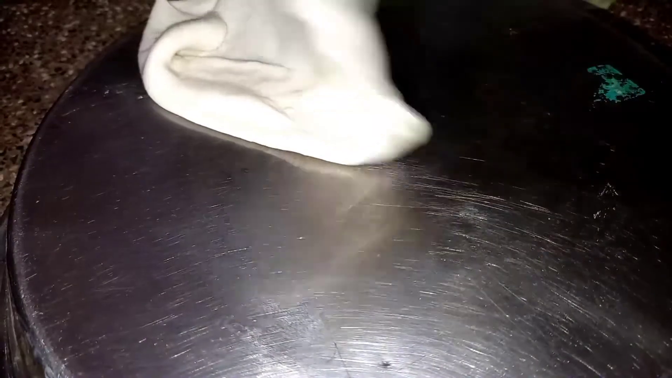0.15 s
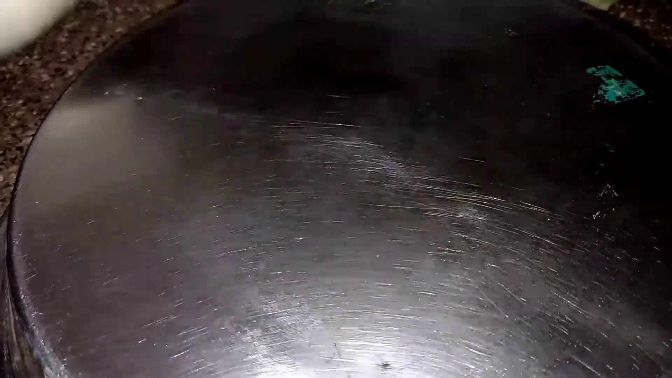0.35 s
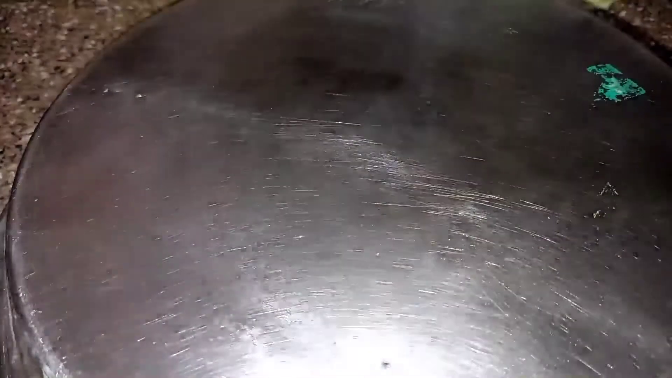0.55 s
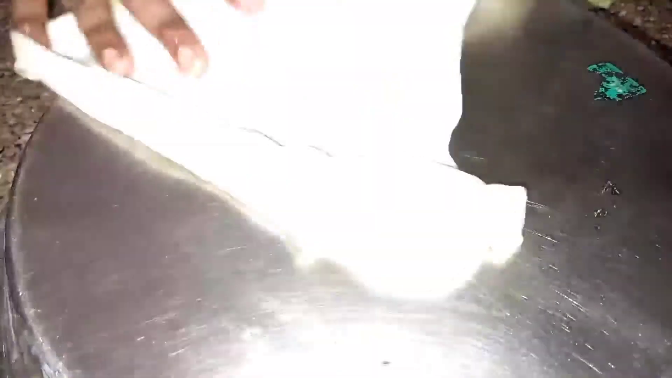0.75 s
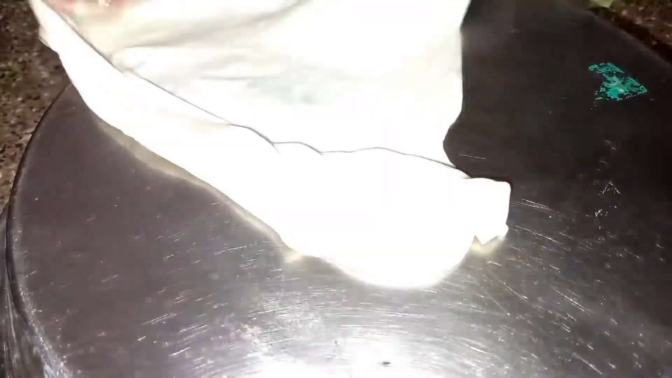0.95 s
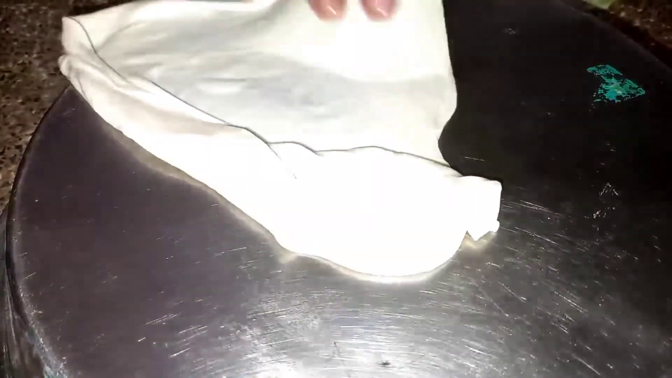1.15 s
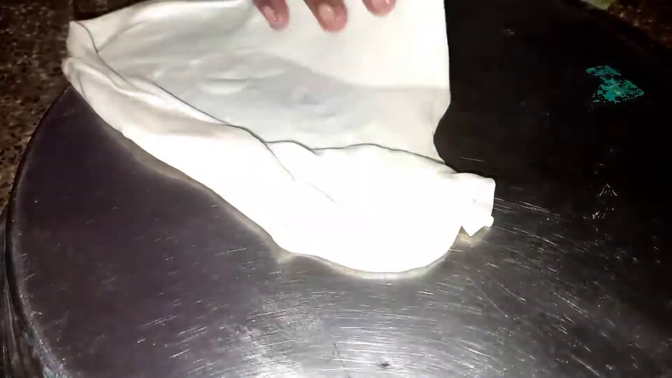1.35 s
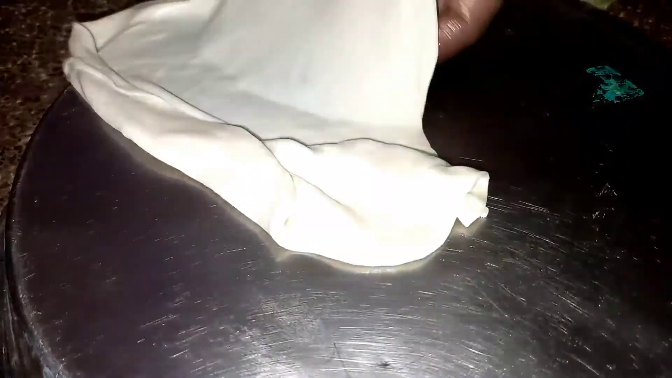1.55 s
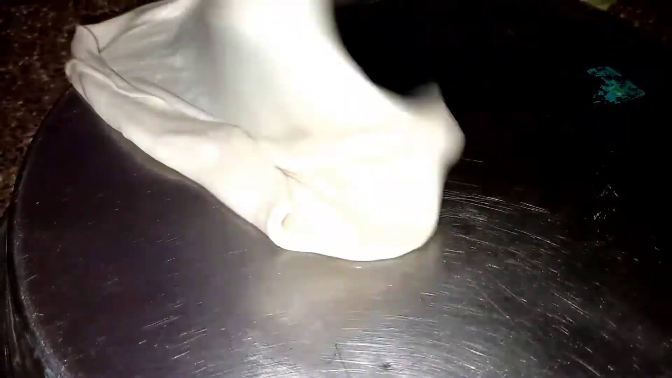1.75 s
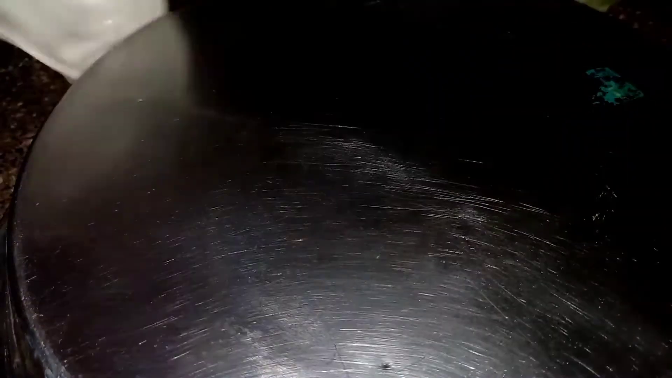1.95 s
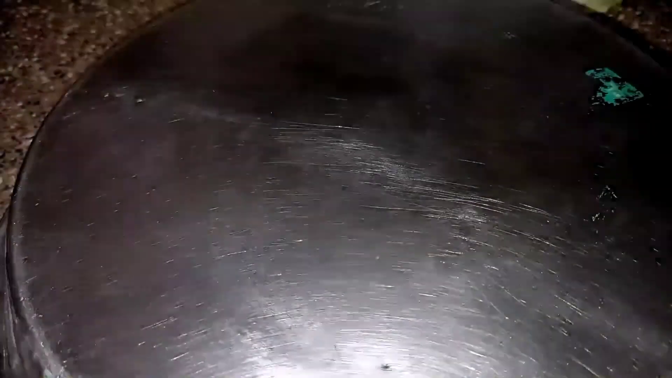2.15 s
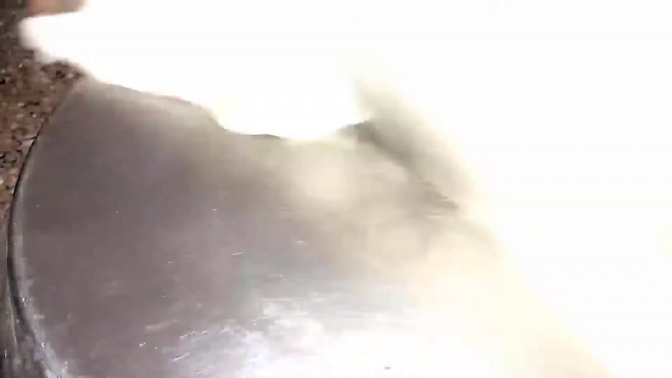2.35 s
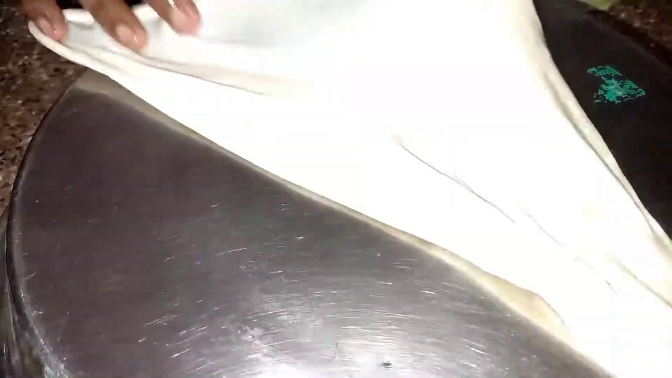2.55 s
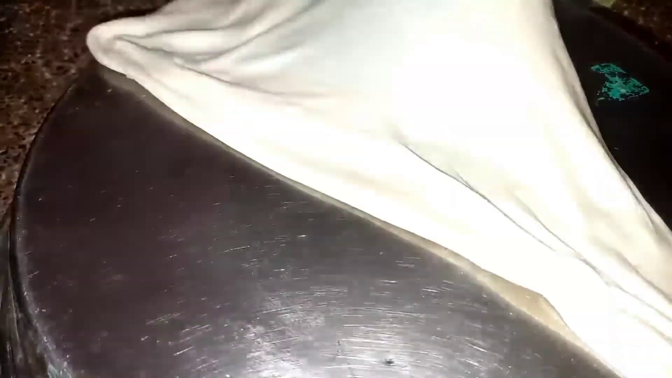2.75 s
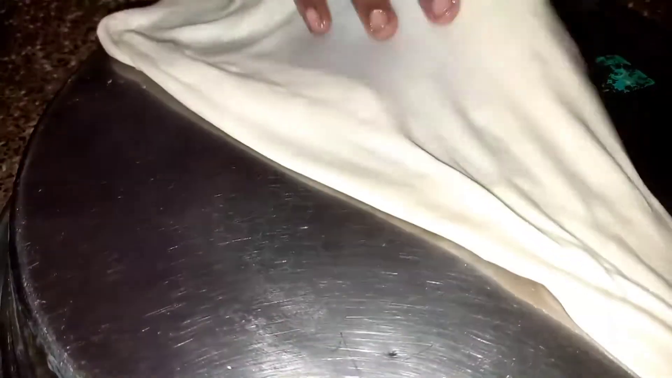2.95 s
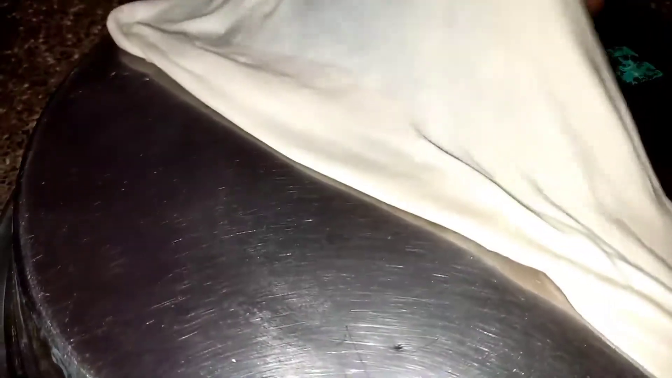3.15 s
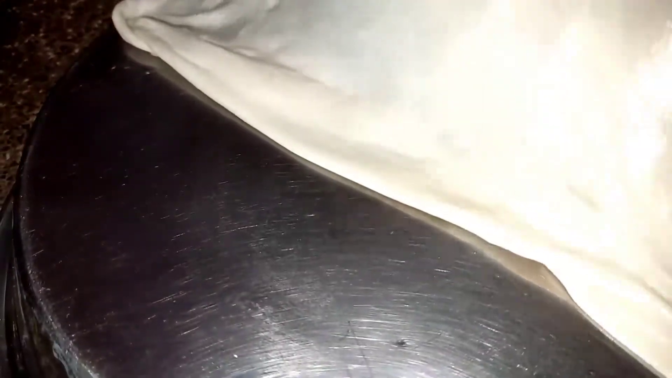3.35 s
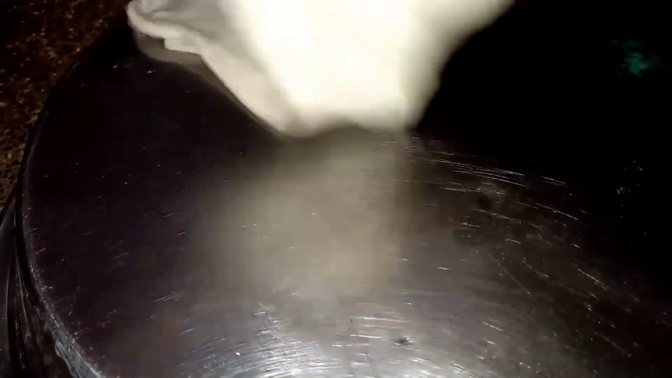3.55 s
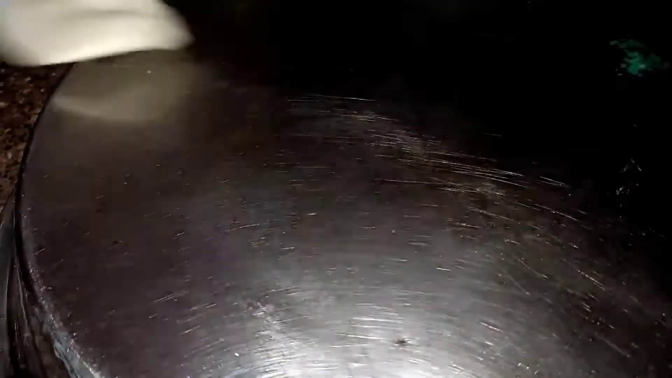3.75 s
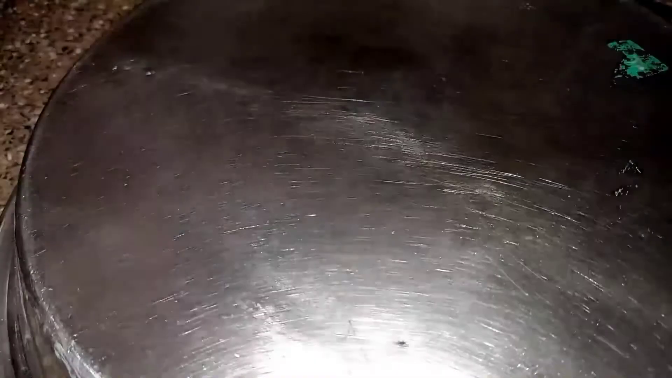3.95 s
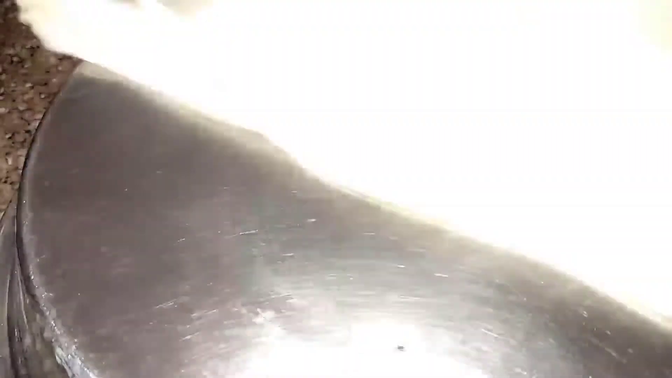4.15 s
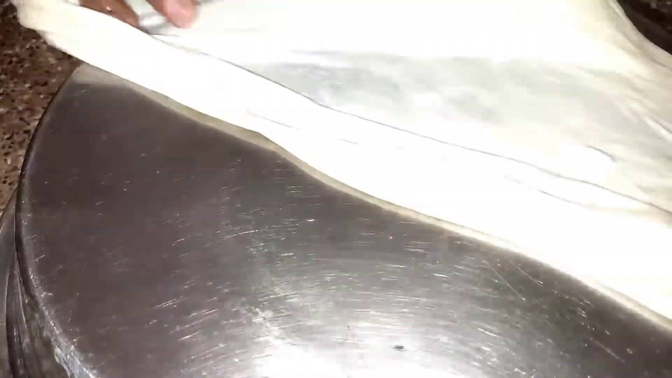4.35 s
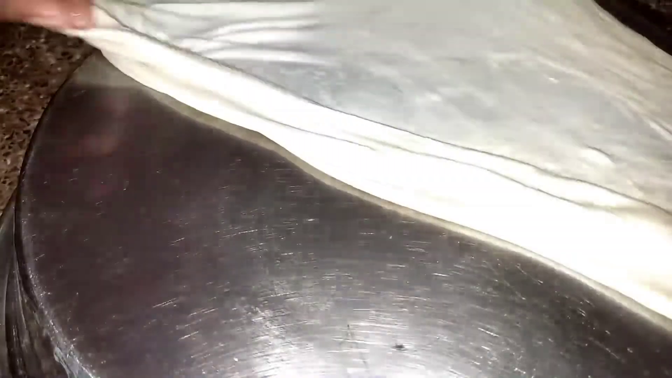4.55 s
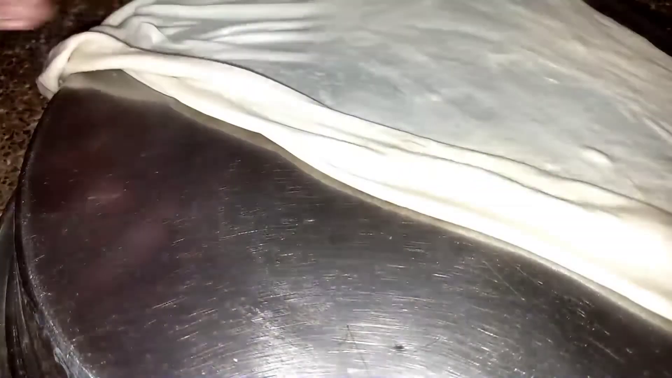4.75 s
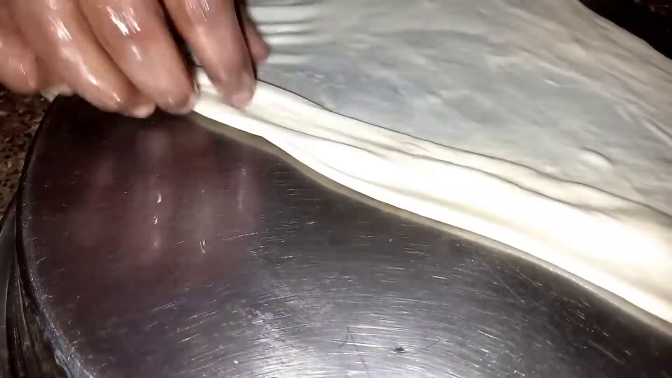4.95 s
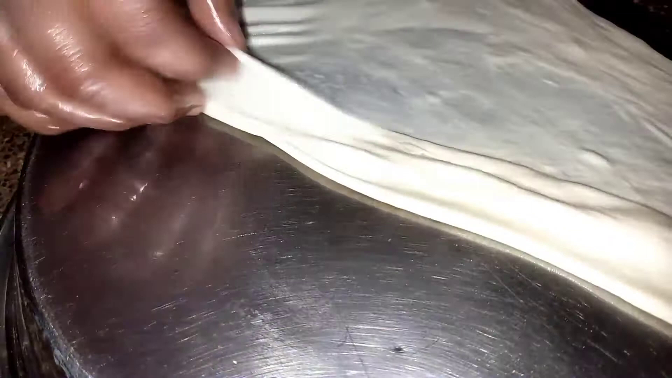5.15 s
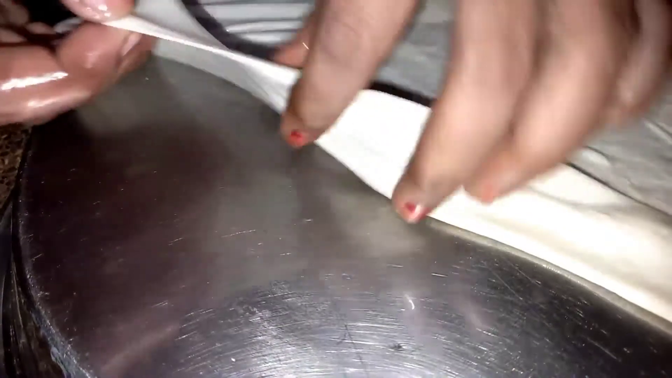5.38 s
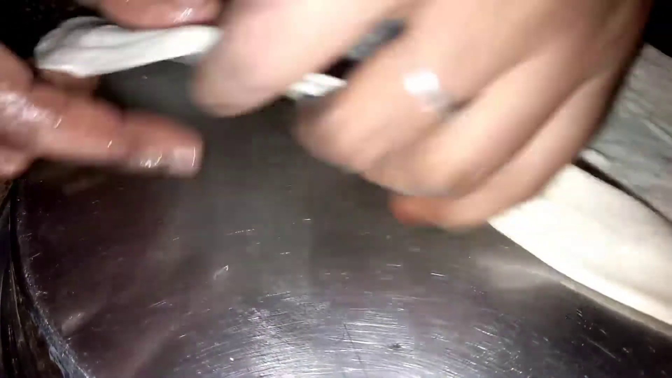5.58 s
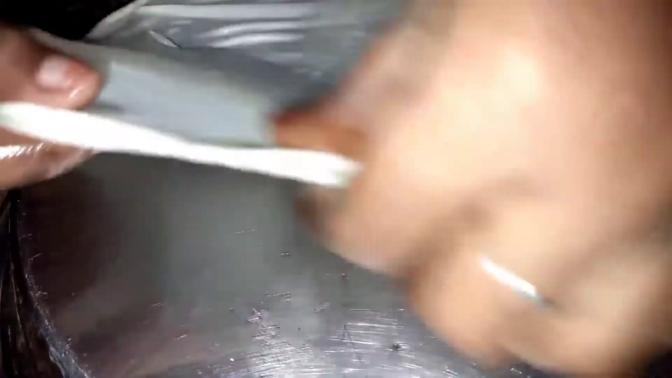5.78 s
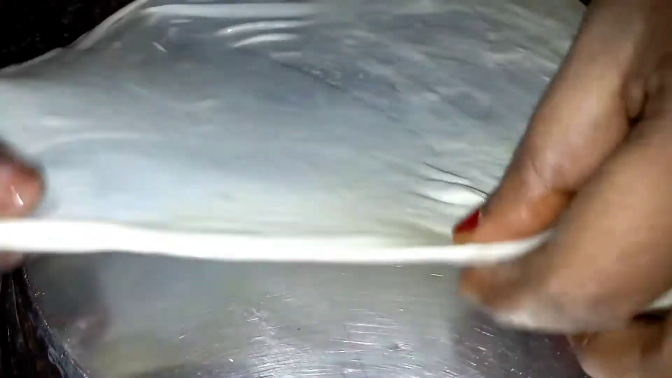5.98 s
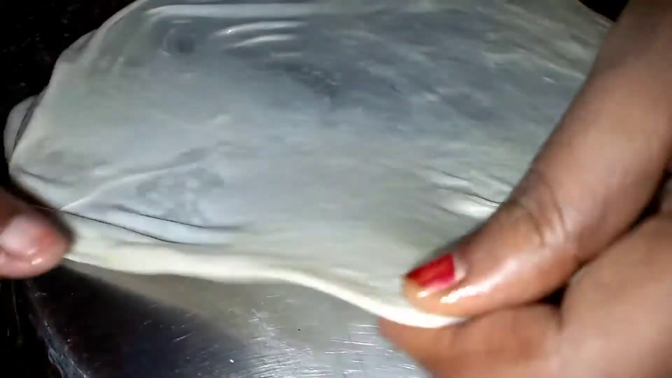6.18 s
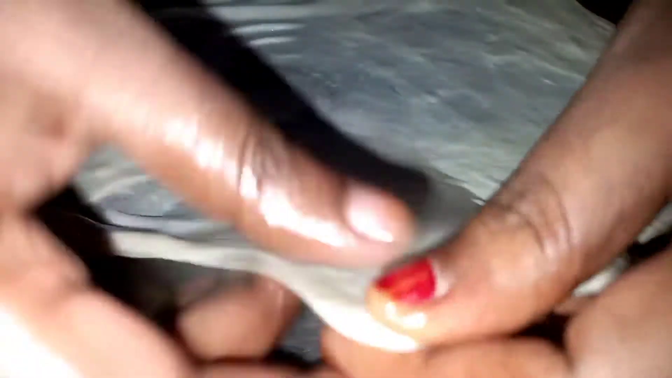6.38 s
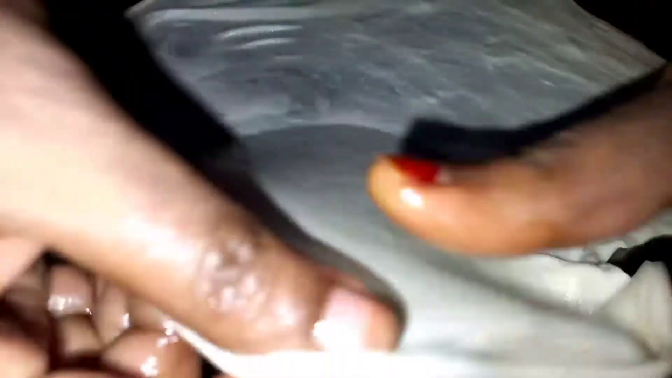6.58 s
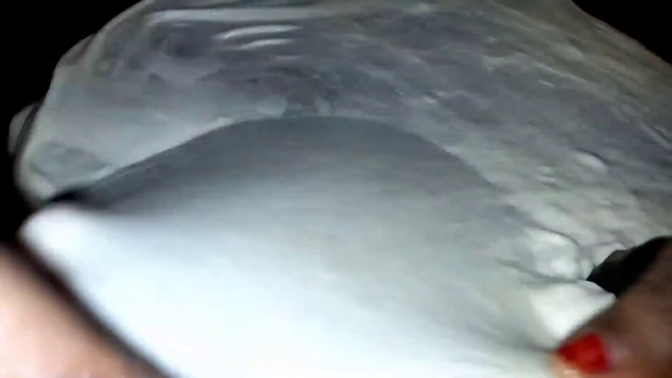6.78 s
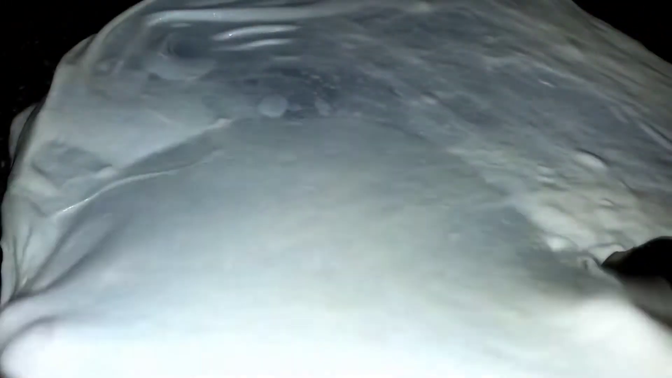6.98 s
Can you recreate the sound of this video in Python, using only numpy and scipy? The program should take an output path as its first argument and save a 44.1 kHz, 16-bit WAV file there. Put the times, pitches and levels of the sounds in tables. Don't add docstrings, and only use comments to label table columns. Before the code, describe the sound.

A small kitchen with hard walls, heard closely through a phone. Low fan noise runs throughout, its level drifting, while a far engine drones around a deep hum in uneven swells. At 0.3 s a glass bangle clinks, thin and high. At 0.7 s oily dough lands on a steel plate, edge then body: a flurry of wet smacks with a dull, damped metallic ring, followed by a low puff of air on the left at 0.8 s. Soft rim knocks come at 1.0 and 1.5 s, a faint clink at 1.6. Bright clinks lead into the second, sharper slap at 2.3-2.4 s. A light knock follows at 3.2. After a small clink near 4.1 s, the third slap lands at 4.15-4.2, crisp and splashy. Then fan and drone continue, with quiet finger knocks from 5.9 to 6.7 s, until about 7 s.

```python
import sys
import numpy as np
from scipy import signal
from scipy.fft import rfft, irfft
from scipy.io import wavfile
from scipy.ndimage import uniform_filter1d

SR = 44100
rng = np.random.default_rng(int(sys.argv[2]) if len(sys.argv) > 2 else 0)


def invert_db(x):
    u = np.asarray(x, float) / 20
    return 10 ** u


def transcribe(u):
    v = np.clip(np.atleast_2d(u).T, -1, 1)
    q = np.round(v * 32767).astype(np.int16)
    wavfile.write(sys.argv[1], SR, q)


N = 309582
DECAY = np.log(1000)


def shape(x, table, peaks=()):
    hz = np.maximum(np.fft.rfftfreq(x.shape[-1], 1 / SR), 1)
    points = np.array(table)
    db = np.interp(np.log(hz), np.log(points[:, 0]), points[:, 1])
    db = db + sum(g / (1 + (2 * (hz - f) / w) ** 2) for f, w, g in peaks)
    return irfft(rfft(x) * invert_db(db), x.shape[-1])


def pair(size):
    alike_hz = 754
    mid, side = rfft(rng.standard_normal((2, size)))
    alike = np.exp(-(np.fft.rfftfreq(size, 1 / SR) / alike_hz) ** 2)
    mid = mid * np.sqrt((1 + alike) / 2)
    side = side * np.sqrt((1 - .96 * alike) / 2)
    return irfft(np.array([mid + side, mid - side]), size)


def unit(x):
    return x / np.sqrt(np.mean(x ** 2))


def walk(rate_hz):
    hold = int(SR / rate_hz)
    steps = np.repeat(rng.standard_normal(N // hold + 1), hold)
    return 1.15 * uniform_filter1d(uniform_filter1d(steps, hold), hold)[:N]


def add(out, s, x):
    i = int(s * SR)
    out[:, i:i + x.shape[1]] += x[:, :N - i]


def ring(modes, t, gain, skew, damp=1):
    hz, db, t60 = np.array(modes).T[:, :, None]
    onset = np.minimum(2 * t * hz, 1)
    fade = gain[:, None] * invert_db(db) * np.exp(-DECAY * damp * t / t60) * onset
    both = np.array([(fade * np.sin(2 * np.pi * hz * t + side * skew[:, None])).sum(0) for side in (0, 1)])
    return both / np.abs(both[0]).max()


# t/s, ring level/dB, smack level/dB, strongest mode f/Hz
CONTACTS = [(0.711, -21, -37, 592), (0.716, -5, -33.5, 402), (0.723, -13.5, -27.5, 283),
            (0.722, -1.5, -26, 470), (0.7433, 1.5, -22.5, 472), (0.755, -4.5, -31, 450),
            (0.779, -15.5, -44, 540), (0.794, -18.5, -51, 295), (0.808, -15, -61, 435),
            (2.338, -16.5, -40, 357), (2.349, -6.5, -30.5, 470), (2.357, -9, -34.5, 497),
            (2.388, -3, -21.5, 402), (2.392, -4, -20, 392), (2.398, 2.5, -17, 493), (2.403, -10, -24, 490),
            (2.411, -4.5, -19.5, 666), (2.439, -31, -49, 530), (4.142, -11, -40, 410),
            (4.169, -25, -23.5, 373), (4.178, -7, -20.5, 430), (4.187, -17, -15, 479),
            (4.194, -18.5, -31, 303), (4.197, 0, -21, 450), (4.211, -4.5, -34, 460), (4.234, -15, -33, 586)]
# t/s, contact/ms, oil spray level/dB at first touch
LANDINGS = [
    (0.705, 10.5, -23),
    (0.74, 3, -17),
    (2.33, 8.5, -6),
    (2.383, 3.9, -14),
    (4.14, 15.5, -9),
    (4.163, 1.86, 7),
]
# t/s, ring level/dB, smack level/dB, strongest mode f/Hz
KNOCKS = [(0.981, -34, -60, 503), (1.471, -14.5, -43, 447), (1.506, -21, -42, 412),
          (1.518, -21.5, -53, 595), (3.163, -18, -48, 566), (5.899, -20, -50, 440), (6.131, -18, -44, 475),
          (6.158, -50, -47, 399), (6.386, -23, -47, 480), (6.426, -30.5, -47, 284),
          (6.438, -25.5, -54, 301), (6.688, -30, -45, 401), (6.715, -24.5, -50, 321)]


def contacts():
    dough_damp, finger_damp = 3.26, 3.56
    knock_ms, knock_spray_db = 4.2, -42
    spent_db, spray_lasts_s = -37, 0.025
    rows = [(*knock, knock_ms, knock_spray_db, finger_damp) for knock in KNOCKS]
    for row in CONTACTS:
        start_s, ms, first_db = [land for land in LANDINGS if land[0] <= row[0]][-1]
        film = np.exp((start_s - row[0]) / spray_lasts_s)
        rows.append((*row, ms, spent_db + (first_db - spent_db) * film, dough_damp))
    return sorted(rows)


# f/Hz, level/dB, free t60/s
PLATE_MODES = [(240, -9, 0.068), (305.5, -0.5, 0.4), (355, -4, 0.28), (445.7, 8.5, 0.17), (452.3, 3, 0.16),
               (508, -3, 0.41), (586.7, 1, 0.48), (687, 10.5, 0.034), (800, -21, .15), (985, -2, 0.26),
               (954, -42, 0.15), (1398, -1, 0.23), (1916, -16, 0.87), (2970, -35, .15)]
# f/Hz, level/dB per Hz
SMACK = [(500, -4), (950, 4.5), (1400, -4.5), (2200, -2.5), (2900, -5.5), (4200, -2.5), (6500, -15.5),
         (11500, -25.5)]
# f/Hz, level/dB per Hz
SPRAY = [(5000, -5), (7000, -3), (8200, -16), (10000, -6), (12000, -2), (14500, -20)]


def slaps():
    out, t = np.zeros((2, N)), np.arange(SR // 6) / SR
    hz = np.array(PLATE_MODES)[:, 0]
    skew = rng.standard_normal(len(hz)) * np.minimum(hz / 900, 3)
    for s, ring_db, smack_db, main_hz, ms, bright_db, damp in contacts():
        contact_s = max(ms, .3) / 1000
        spot = .4 + np.exp(-(np.log(hz / main_hz) / .17) ** 2)
        plate = ring(PLATE_MODES, t, spot, skew, damp) * (1 - np.exp(-t / (0.35 * contact_s)))
        air = pair(size=len(t))
        spray_db = bright_db + 7.0 + 0.27 * (smack_db + 28)
        wet = unit(shape(air, SMACK)) + invert_db(spray_db) * unit(shape(air, SPRAY))
        pockets = invert_db(3 * np.repeat(rng.standard_normal(len(t) // 40 + 1), 40)[:len(t)])
        burst = pockets * (1 - np.exp(-t / (0.081 * contact_s))) * np.exp(-t / contact_s)
        add(out, s, invert_db(ring_db - 2.0) * plate + invert_db(0.99 * smack_db + 6.5) * wet * burst)
    return out * invert_db(np.array([[.8], [-.8]]))


# t/s, level/dB, f/Hz, t60/s
POPS = [(0.723, -19.5, 10000, 0.011), (0.73, -18, 400, 0.076), (.748, -16.5, 5000, .015),
        (1.507, -25, 326, 0.014), (2.393, -12, 4250, 0.021), (2.411, -20, 5700, 0.011),
        (3.162, -40, 397, 0.052), (3.165, -26, 304, 0.04), (4.088, -22, 12200, 0.014),
        (4.176, -12.5, 1340, 0.0078), (4.193, -6.5, 2860, 0.019), (5.9, -34, 950, 0.039),
        (6.16, -39, 4360, 0.029), (4.153, -24, 558, 0.1), (0.742, -26, 4150, 0.011),
        (6.436, -22.5, 240, 0.036), (6.70, -37, 1100, 0.038), (6.708, -34, 515, 0.059),
        (6.726, -29, 325, 0.042), (.750, -27, 3230, 0.018), (2.401, -18, 6230, 0.022)]


def pops():
    out, t = np.zeros((2, N)), np.arange(SR // 8) / SR
    for s, db, hz, t60 in POPS:
        skew = rng.standard_normal(2) * min(hz / 900, 3)
        tones = [(hz * .96, 0, t60), (hz * 1.05, -3, t60)]
        add(out, s, invert_db(db) * ring(tones, t, np.ones(2), skew))
    return out


# t/s, level/dB, lower ring share/dB, ring length/0-1
CLINKS = [(0.339, -20.5, -10, 0.33), (0.3451, -36, -15, 0.3), (1.5865, -28.5, -7, 0.6),
          (1.5955, -32, -18, 0.8), (2.0303, -41, -4, 0.4), (2.3036, -22, -5, 0.3), (2.3183, -25, -2, 0.54),
          (2.3278, -11, -12, 0.33), (2.333, -8, -12, 0), (2.3434, -19, -6, 0.4), (4.0658, -25.5, -7.5, 0.7)]
# f/Hz, level/dB, t60/s
BANGLE_HIGH = [(10460, -2, .08), (11900, -1, 0.46), (11600, -1, 0.31), (11960, 10, 0.057),
               (12600, -4, 0.11), (12600, 2, .1), (12900, 7, 0.099), (15200, -3, .08)]
# f/Hz, level/dB, t60/s
BANGLE_LOW = [(4000, -22, .08), (6900, -4, 0.049), (7160, -9, 0.1), (7510, -1, .08), (8200, -11, 0.13),
              (9000, -8, 0.073)]


def bangles():
    out, t = np.zeros((2, N)), np.arange(SR // 5) / SR
    for s, db, low_db, length in CLINKS:
        damp = 1 / np.clip(length, .05, 2)
        for touch in range(5):
            chance = rng.standard_normal((6, 8))
            detune = np.ones((8, 3))
            detune[:, 0] += 0.015 * chance[4]
            high = ring(BANGLE_HIGH * detune, t, invert_db(2.7 * chance[0]), 2 * chance[1], damp)
            low = ring(BANGLE_LOW * detune[:6], t, invert_db(1.7 * chance[2, :6]), 2 * chance[3, :6], damp)
            touch_s = s + .0025 * touch * (1 + 0.66 * chance[5, 0])
            add(out, touch_s, invert_db(db - 7 - 1.6 * touch) * (high + invert_db(low_db) * low))
    return out


# t/s, level/dB, f/Hz, decay/cycles
PUFFS = [(0.331, -39, 79, 2.8), (0.8008, -8, 102, 0.41), (0.8088, -6.5, 80, 1.7), (.98, -31.5, 83, 2.1),
         (2.335, -17, 82.5, 0.96), (2.394, -21, 98.5, 2.4), (3.609, -36, 81, 4.3), (4.168, -25, 93, 1.2),
         (4.194, -27, 150, 4.1), (4.22, -38, 102, 4.8), (6.431, -32, 150, 5.3), (6.779, -40, 79.8, 3.1)]


def puffs():
    out, t = np.zeros((2, N)), np.arange(SR // 4) / SR
    for s, db, hz, cycles in PUFFS:
        rough = 1 + 0.035 * shape(rng.standard_normal(len(t)), [(200, 46), (600, -32)])
        thump = np.sin(2 * np.pi * hz * t) * np.exp(-t * hz / cycles) * rough
        add(out, s, invert_db(db) * thump * np.array([[1], [-.03]]))
    return out


# f/Hz, t60/s, level/dB
ROOM = [(150, 0.49, 6), (450, 0.48, -5), (1010, 0.34, 5), (2550, 0.47, 1), (5000, 0.4, -1.5),
        (10000, 0.24, 2)]


def room(x):
    t = np.arange(SR // 2) / SR
    noise, hz = rfft(pair(size=len(t))), np.fft.rfftfreq(len(t), 1 / SR)
    centres = np.log(np.array(ROOM)[:, 0])
    tail = 0
    for k, (_, t60, db) in enumerate(ROOM):
        weight = np.interp(np.log(hz + 1), centres, np.eye(len(ROOM))[k])
        tail = tail + irfft(noise * weight, len(t)) * invert_db(db) * np.exp(-DECAY * t / t60)
    tail = tail * (1 - np.exp(-t / 0.00061))
    tail = tail / np.sqrt(np.mean(np.sum(tail ** 2, axis=1)))
    return signal.fftconvolve(x, tail, axes=1)[:, :N]


# t/s, level/dB
GAIN = [(0.0, -54), (0.19, -53), (0.54, -50), (0.8, -51.5), (0.96, -55), (1.6, -53), (1.9, -55), (2.3, -52),
        (2.81, -54.5), (3.52, -53.5), (3.85, -51.5), (4.2, -50), (4.5, -56), (5.3, -56), (5.55, -54.5),
        (5.9, -49.5), (7.02, -49)]


def gain_db(time):
    stir_db, rise_s, fall_s = 8.5, .06, .12
    age = np.maximum(time - np.array(LANDINGS)[1::2, :1], 0)
    stir = (1 - np.exp(-age / rise_s)) * np.exp(-age / fall_s)
    return np.interp(time, *np.transpose(GAIN)) + stir_db * stir.sum(0)


# start t/s, length/s, f/Hz, start level/dB, drift/(dB/s)
SWELLS = [(0.274, 0.46, 85.4, -42.5, 5), (0.92, 0.12, 85, -37, 5), (1.0, 0.49, 84.7, -45.5, -5),
          (1.83, 0.3, 85.5, -53.5, -8), (2.506, 0.71, 86.5, -45, 6.5), (3.265, 0.13, 86, -55, -40),
          (3.587, 0.17, 85.7, -35, -110), (4.004, 0.29, 86.9, -53.5, 24), (4.444, 0.21, 85.4, -52, 10),
          (4.803, 0.21, 86.9, -55, 42), (4.955, 0.61, 85.5, -43, -36), (5.68, 0.32, 84.6, -43, 32),
          (5.928, 0.57, 85.3, -34.5, -13.5), (6.463, 0.35, 85.6, -41.5, -17), (6.84, 0.3, 84.8, -50, 55)]
# multiple of the turn rate, level/dB; f in SWELLS is the third
DRONE_ORDERS = [(2, -14), (3, -1.5), (4, -14), (5, -20), (6, -18.5)]


def drone(time):
    rise_s, fall_s, idle_db = 0.053, 0.045, -81
    s, length, hz, db, drift = np.array(SWELLS).T[:, :, None]
    coarse = time[::64]
    age = coarse - s
    gate = np.clip(age / rise_s, 0, 1) * np.clip((length - age) / fall_s, 0, 1)
    swell = (gate * invert_db(db + drift * np.clip(age, 0, length))).sum(0)
    size = np.interp(time, coarse, invert_db(idle_db) + swell)
    pitch = np.interp(time, (s + length / 2)[:, 0], hz[:, 0])
    phase = 2 * np.pi * np.cumsum(pitch * (1 + .015 * walk(25))) / SR / 3
    orders = sum(invert_db(db) * np.sin(round(k) * phase) for k, db in DRONE_ORDERS)
    return np.sqrt(2) * size * invert_db(1.4 * walk(22)) * orders


# f/Hz, level/dB per Hz
FAN = [(25, -32), (45, -10.5), (87, -7), (130, -10.5), (250, -7.5), (400, -18), (850, -21.5), (1300, -25),
       (2500, -33), (4000, -38.5), (6600, -40), (8200, -48), (10500, -43.5), (14500, -53)]
# f/Hz, width/Hz, level/dB
ROOM_TONES = [(123.7, 8.3, 8.5), (190, 18, 4.5), (204, 54, 3), (269.7, 39, 4.5), (331.5, 48, 7),
              (498, 104, 8)]


def kitchen():
    low_over_db, low_follows = 7, 1.12
    time = np.arange(N) / SR
    treble_db = gain_db(time)
    mean_db = treble_db.mean()
    low_db = mean_db + low_over_db + low_follows * (treble_db - mean_db)
    spectrum, hz = rfft(shape(pair(size=N), FAN, ROOM_TONES)), np.fft.rfftfreq(N, 1 / SR)

    def level(lo_hz, hi_hz):
        return np.sqrt(np.mean(irfft(spectrum * (hz > lo_hz) * (hz < hi_hz), N) ** 2))

    treble = invert_db(treble_db) / level(1656, 10000)
    low = invert_db(low_db) / level(93, 1350)
    out = 0
    for octave in np.arange(5, 15):
        band = np.clip(1 - np.abs(np.log2(hz + 1) - octave), 0, 1)
        share = np.clip((octave - 8.5) / 1.5, 0, 1)
        gain = treble ** share * low ** (1 - share)
        out = out + irfft(spectrum * band, N) * gain * invert_db(0.75 * walk(9.7))
    return out + drone(time)


def scene():
    room_db = -7.5
    near = slaps() + pops() + bangles()
    return near + invert_db(room_db) * room(near) + puffs() + kitchen()


def band_limit(x):
    return signal.sosfilt(signal.butter(12, 16510, fs=SR, output="sos"), x)


def record(dry):
    low_hz, top_hz = 56, 15400
    dry = signal.sosfilt(signal.butter(3, low_hz, "high", fs=SR, output="sos"), dry)
    dry = signal.sosfilt(signal.butter(12, top_hz, fs=SR, output="sos"), dry)
    mix = np.tanh(dry / 1.29) * 1.36
    return band_limit(mix)


dry = scene()
out = record(dry)
transcribe(out)
```